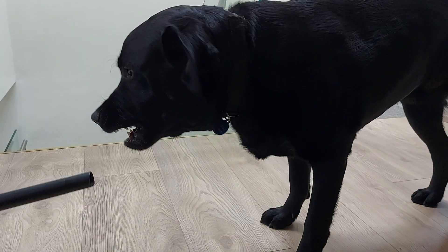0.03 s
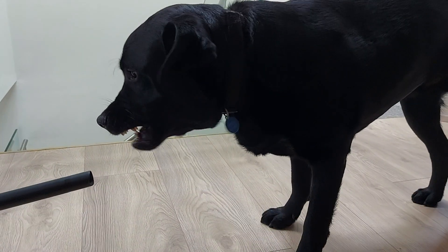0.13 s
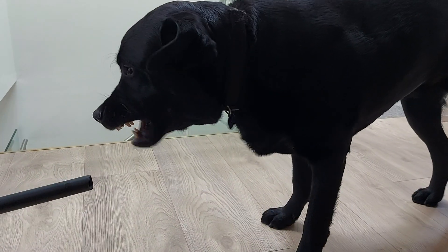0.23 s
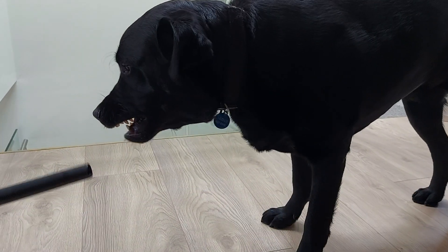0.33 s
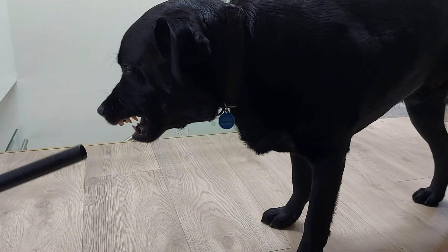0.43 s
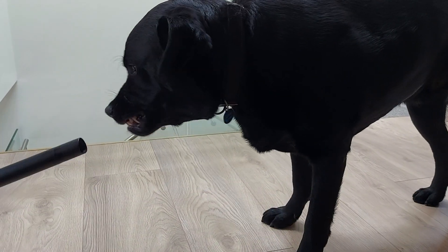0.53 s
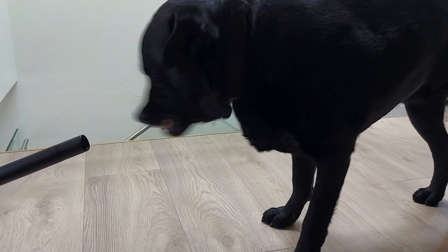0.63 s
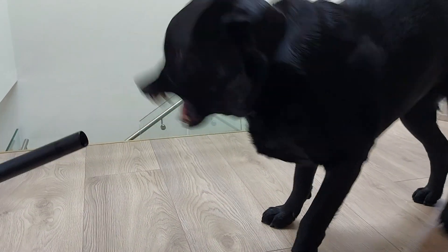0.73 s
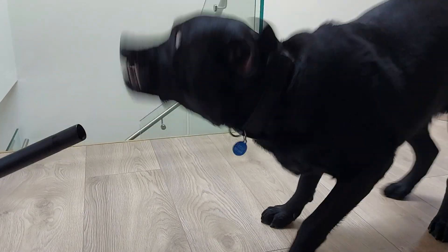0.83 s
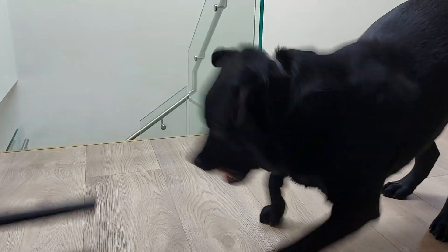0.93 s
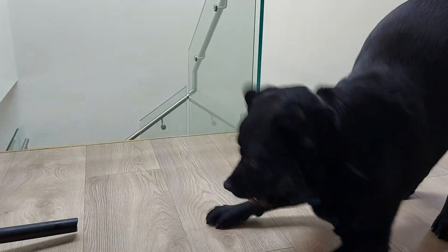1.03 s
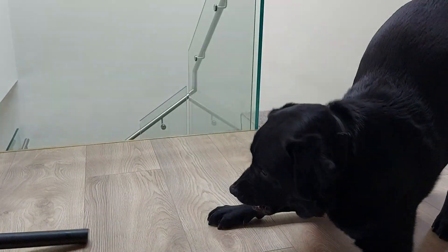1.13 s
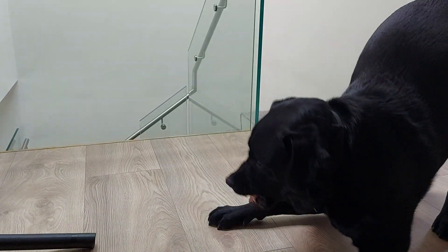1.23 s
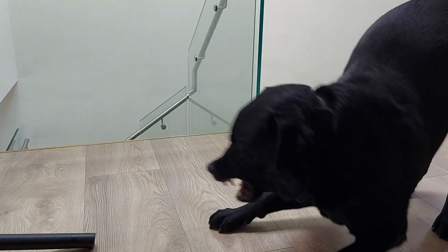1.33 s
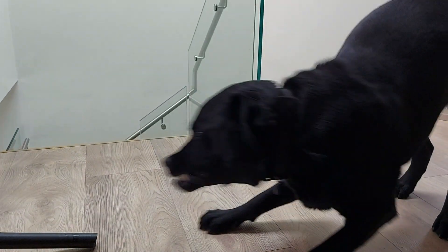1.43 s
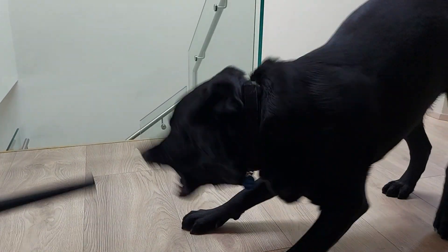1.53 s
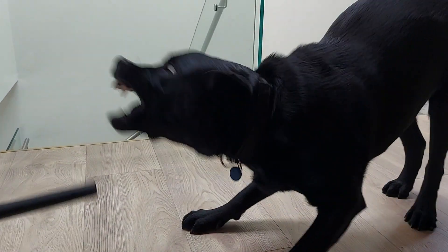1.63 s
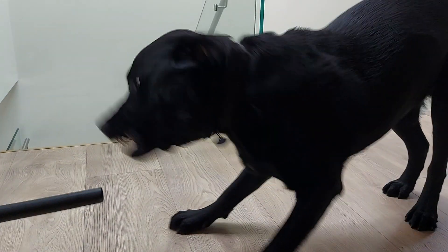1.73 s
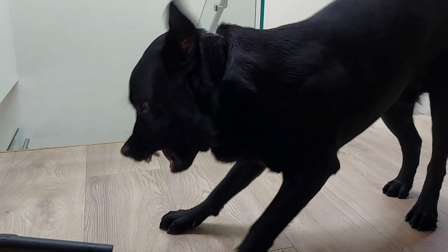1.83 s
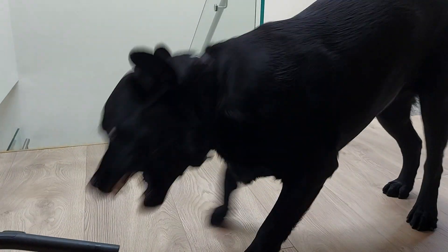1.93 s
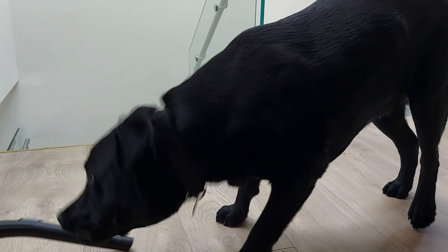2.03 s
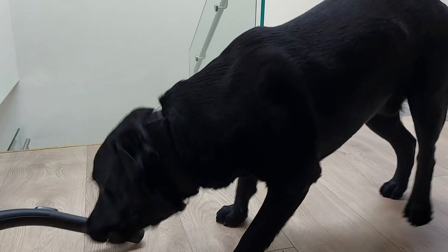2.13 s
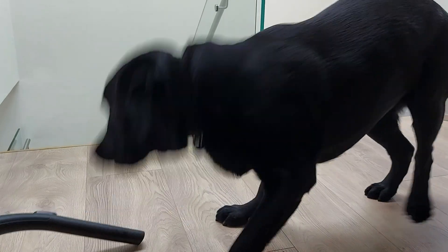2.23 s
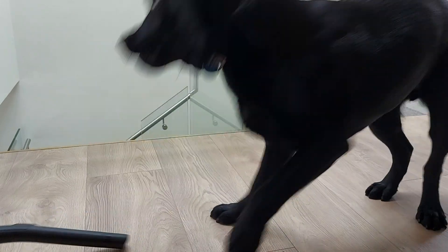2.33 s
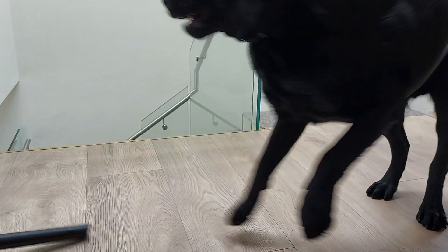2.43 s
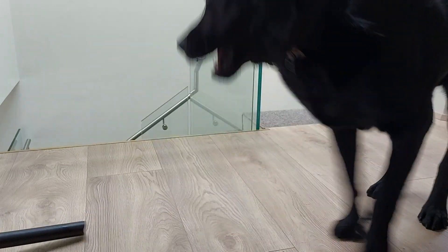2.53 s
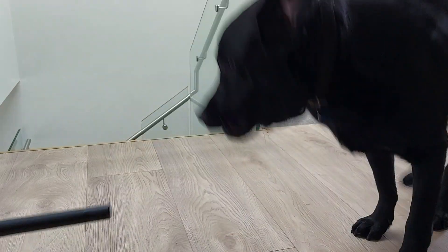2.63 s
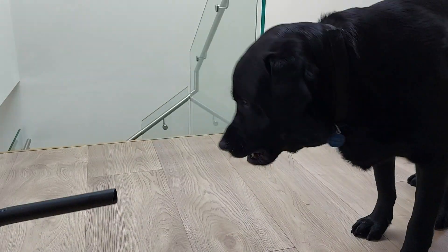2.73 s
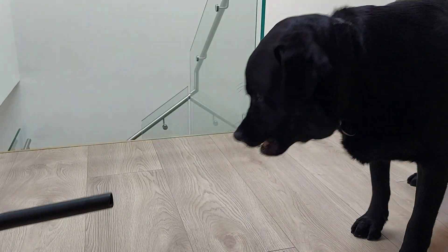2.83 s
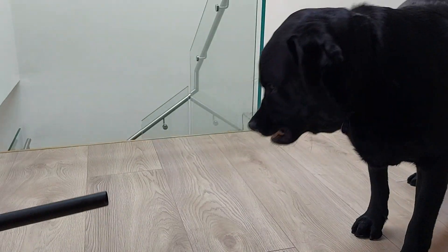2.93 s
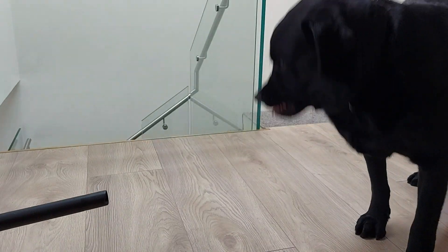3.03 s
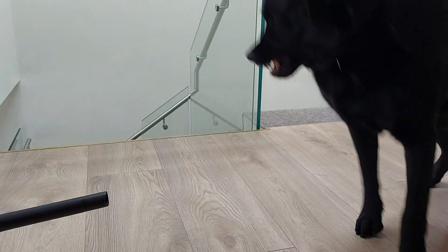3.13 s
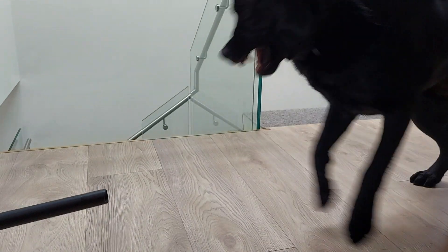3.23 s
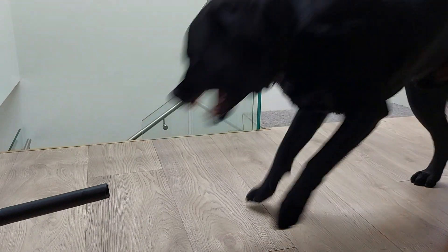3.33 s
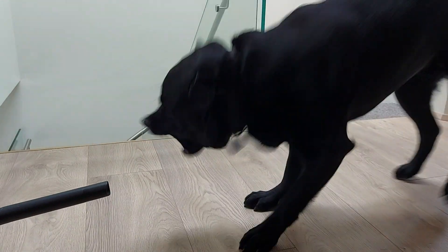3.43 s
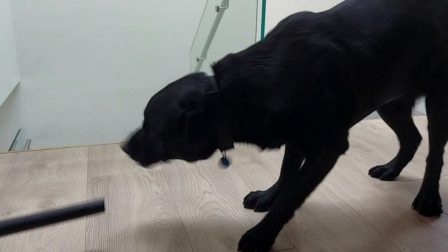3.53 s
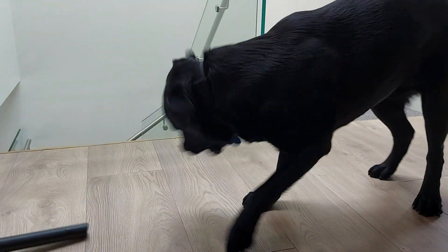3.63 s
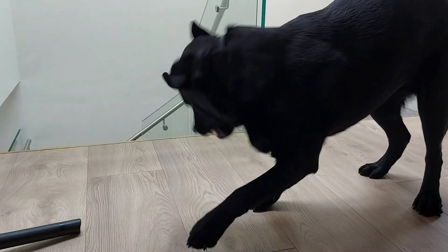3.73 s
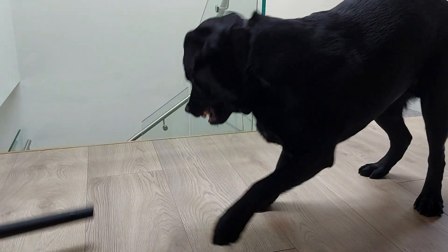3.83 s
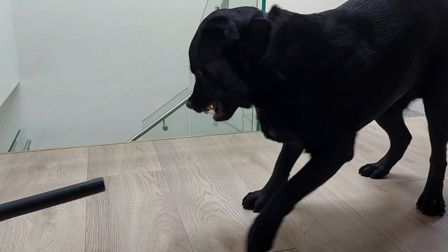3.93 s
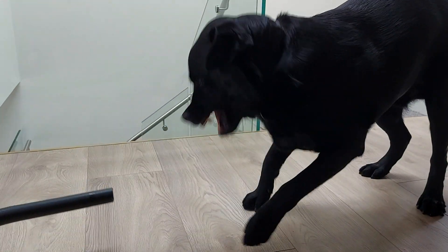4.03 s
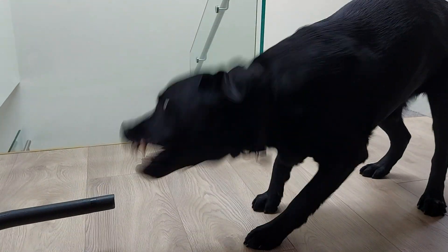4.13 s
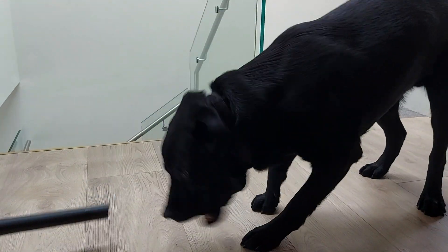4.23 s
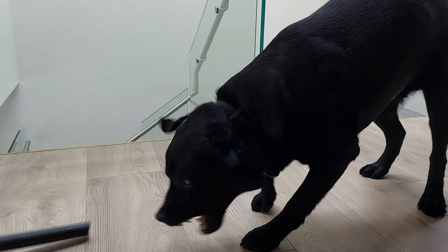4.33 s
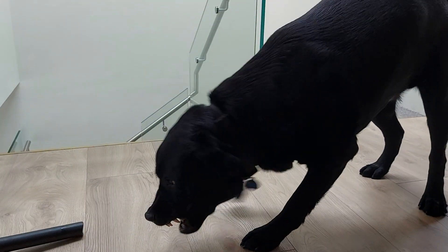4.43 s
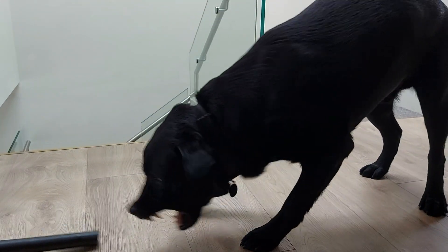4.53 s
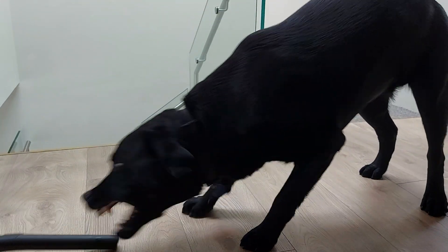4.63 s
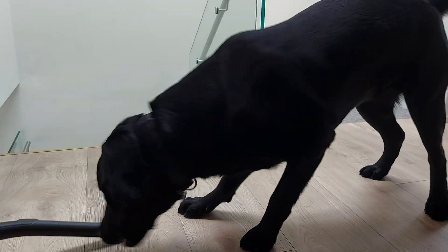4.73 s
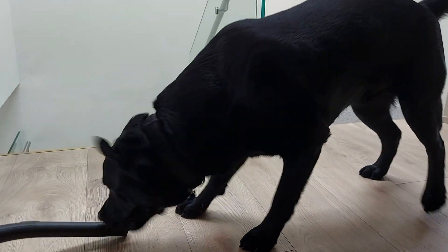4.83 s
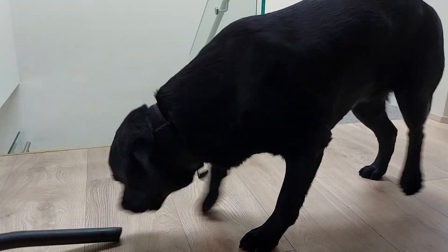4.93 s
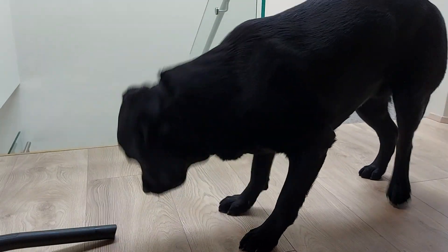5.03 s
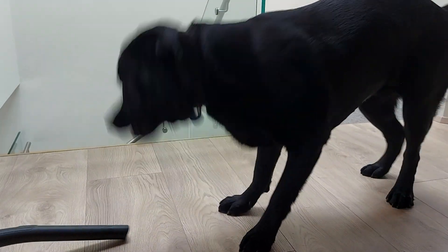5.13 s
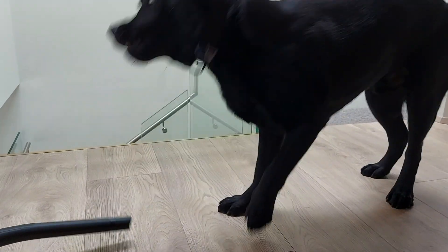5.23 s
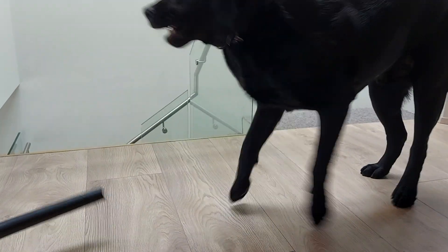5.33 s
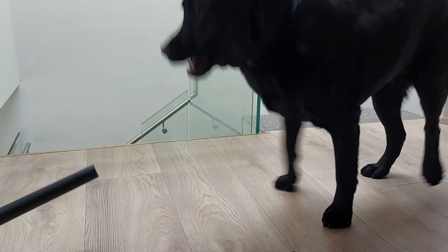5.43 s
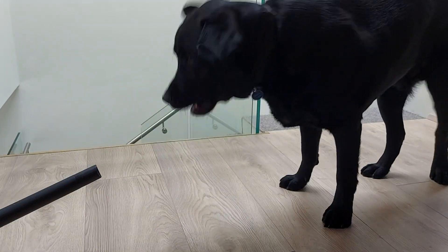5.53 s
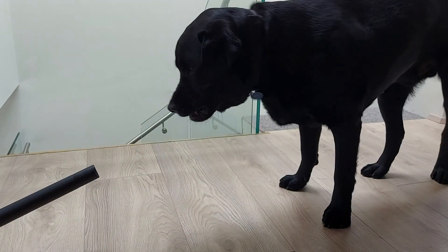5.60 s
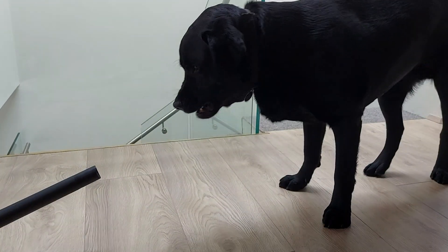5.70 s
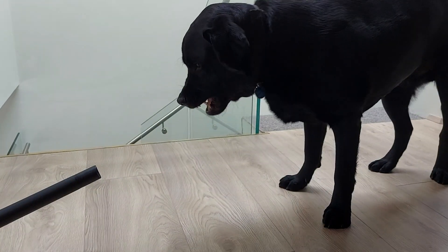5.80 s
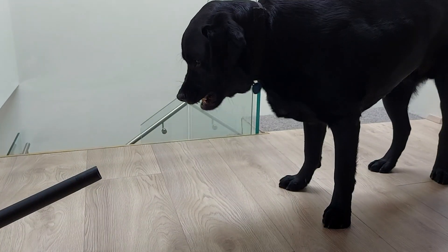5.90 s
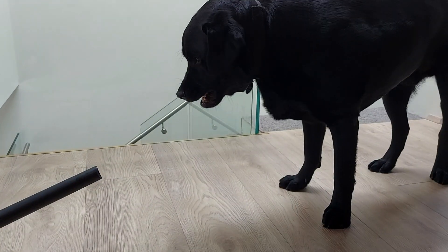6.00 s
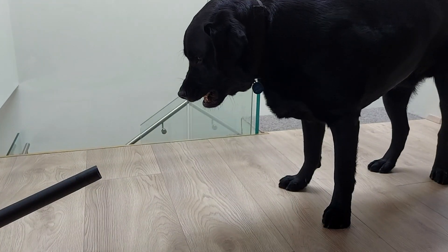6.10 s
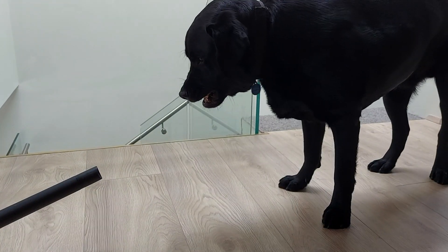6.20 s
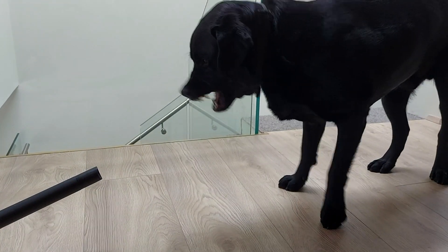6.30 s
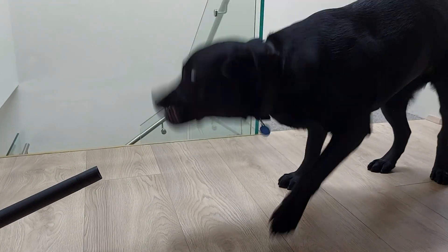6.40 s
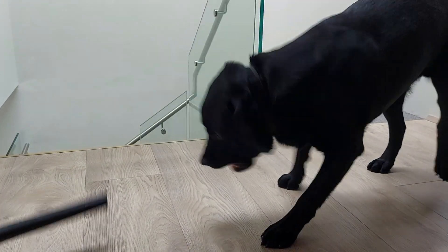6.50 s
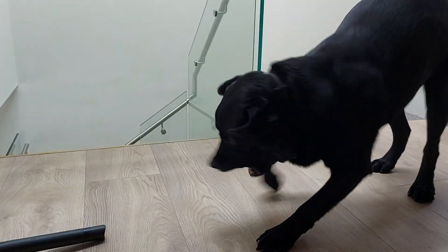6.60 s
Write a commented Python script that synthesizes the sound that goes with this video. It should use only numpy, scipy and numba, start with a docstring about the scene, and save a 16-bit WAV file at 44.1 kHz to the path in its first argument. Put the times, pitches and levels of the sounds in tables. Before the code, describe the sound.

A vacuum cleaner runs from start to finish on a hard-floored landing, humming one steady mid-pitched note over rushing air. Close to the microphone and much louder, a large dog barks at about 0.8 and 1.6 seconds, again at 3.5, 4.1 and 4.6, and once more at 6.4. Each bark is short, leaps in pitch and turns hoarse, ringing in the stairwell for just under a second. Claws tick on the floor around 1 second, between 1.9 and 2.7, and near 3.4, 5.5 and 6.6. Paws land with soft, low thuds here and there. A collar tag clinks faintly a few times between 3.4 and 4.9 seconds. A thin, faint hiss of air comes and goes around 2.2 seconds. The vacuum swells ahead of some barks and then drops back, most clearly at 3.4 and 6.4 seconds.

```python
"""Dog barking at a vacuum cleaner

On a hard-floored landing, close to the microphone, a large dog barks six times into a ringing stairwell.
Each bark starts voiced, leaps in pitch and turns hoarse; claws tick, paws thud, a collar tag clinks.
Behind, the vacuum's motor hums one strong note over rushing air. The recorder's gain lifts that steady
sound ahead of some barks, then drops back, and a limiter holds the barks down."""
import sys
import numpy as np
from scipy import signal
from scipy.fft import rfft, irfft, next_fast_len
from scipy.io import wavfile
from scipy.ndimage import uniform_filter1d, minimum_filter1d
from numba import njit

SR = 44100
rng = np.random.default_rng(int(sys.argv[2]) if len(sys.argv) > 2 else 0)


def pcm_store(signal):
    """Save signal as 16-bit PCM."""
    levels = np.round(np.clip(np.atleast_2d(signal), -1, 1) * 32767)
    wavfile.write(sys.argv[1], SR, levels.astype(np.int16).T)


N = 293706
TIME = np.arange(N) / SR

# Table levels are relative; balance is left minus right at the microphone.
# The barks, each a dict of five gestures, timed from the start of its call:
#   call: start/s, length/s, balance/dB, lead-in growl/dB
#   arch (pitch): first/Hz, top/Hz, last/Hz, crest/s, rise/s, fall/s
#   hoot (chest): peak/s, level/dB, attack/(dB/s), release/(dB/s)
#   jaw (open mouth): open/s, level/dB, attack/(dB/s), release/(dB/s), hold/s
#   crack (into hoarseness): t/s, roughness 0-1 before, after, mouth resonance/Hz before, after
BARKS = [ dict(call=(0.773, .225, -1, -48), arch=(540, 660, 450, .049, .036, .058),
         hoot=(.052, -10.5, 420, 78), jaw=(.048, -15.5, 2400, 290, .112), crack=(.1, .85, .68, 770, 1180)),
         dict(call=(1.567, .27, -.7, -30), arch=(290, 545, 515, .1, .056, .07), hoot=(.096, -10.5, 200, 20),
         jaw=(.085, -11, 185, 175, .028), crack=(.053, .2, .42, 1280, 1300)), dict(call=(3.455, .2, 2, -42),
         arch=(390, 645, 390, .088, .055, .075), hoot=(.033, -3, 900, 210), jaw=(.09, -7.5, 95, 190, .012),
         crack=(.083, .1, .72, 1200, 1330)), dict(call=(4.148, .14, 1, -35),
         arch=(295, 555, 430, .065, .045, .036), hoot=(.087, -6.5, 320, 400),
         jaw=(.015, -10, 1000, 480, .044), crack=(.054, .25, .58, 930, 1100)),
         dict(call=(4.55, .3, .8, -26.5), arch=(285, 526, 430, .207, .046, .04), hoot=(.21, -6, 330, 230),
         jaw=(.17, -15, 290, 650, .035), crack=(.167, .1, .6, 950, 1150)), dict(call=(6.381, .2, .8, -35),
         arch=(340, 595, 325, .054, .031, .066), hoot=(.1, -16.5, 150, 110),
         jaw=(.014, -6, 1000, 175, .026), crack=(.046, .15, .76, 750, 1130))]
# The mouth in each bark: rasp f/Hz, its level/dB, level a fifth above/dB, tongue resonance/dB
MOUTHS = [(3300, -44, -29, -32), (3910, -25, -22.5, -22), (3600, -22, -26, -26), (3740, -23, -27.5, -4),
          (3500, -30, -25, -6), (3650, -26.5, -41, -4.5)]
# The throat's colour: f/Hz, level/dB
THROAT_COLOUR = [(150, -28), (280, -8), (500, -8), (800, 1), (1200, -1), (1600, -1), (2250, -2),
                 (2500, -13), (2900, -31), (3900, -22.5), (7000, -23.5), (9500, -35), (12500, -32),
                 (16000, -41)]
# Claws striking the floor: t/s, level/dB, balance/dB, top-octave lift/dB
CLAW_STRIKES = [(0.98, -32, -1.5, 24), (1.0417, -16.5, -5.5, 24), (1.1187, -26, -4.5, 19),
                (1.9007, -31.5, -4, 19), (2.0072, -31, -8.5, 15), (2.362, -27, 2, 13), (2.597, -25, -1, 16),
                (2.6602, -22.5, -1, 18), (2.7285, -28.5, -1, 9), (3.4414, -24, 1, 22),
                (5.4321, -24.5, -4, 8), (5.4911, -27, -1.5, 3), (6.648, -30, 1, 18)]
# The colour of a claw's crack: f/Hz, level/dB
CLAW_COLOUR = [(400, -3.5), (1200, 4.5), (2500, 9.5), (3800, 12.5), (5500, 5), (8000, 9), (10000, -15),
               (13000, -9.5), (16000, -34)]
# Paws landing: t/s, level/dB
PAW_FALLS = [(0.066, -34), (0.789, -28), (1.442, -44), (2.197, -42), (3.269, -48), (3.426, -42),
             (5.049, -35)]
# The floor's modes: f/Hz, level/dB, t60/s
FLOOR_MODES = [(61.6, -4, .35), (80.6, -4, 0.45), (105, 3, 0.16), (140, -3, 0.2), (206, 1.5, 0.16)]
# Knocks on the collar tag: t/s, level/dB
TAG_KNOCKS = [(3.4244, -40), (3.6676, -46), (3.6894, -53), (4.2887, -58), (4.8898, -53)]
# The motor's orders: multiples of its main note
MOTOR_ORDERS = [1, 2, 3, 3.5, 4, 4.8, 8, 16, 20, 24]
# The tone at each order: level/dB, phase lead of the left channel/rad
MOTOR_TONES = [(-35, -0.135), (-66, 0.4), (-55, -1.05), (-73, 1.4), (-67, 0.79), (-66.5, 1.1), (-69, -0.92),
               (-59.5, -2.6), (-75, 1), (-84, -1)]
# The vacuum's rushing air: f/Hz, spectral density/dB
AIR_COLOUR = [(30, -31), (65, -4), (102, 5.5), (160, -6.5), (230, 2.5), (300, 9), (420, 3.5), (560, 9.5),
              (1000, -1), (2000, 1), (4200, -2), (7800, -7.5), (9600, -13.5), (12000, -6), (16000, -20.5)]
# Where that air sits in the stereo image: f/Hz, balance/dB
AIR_BALANCE = [(100, -.5), (1300, -.5), (2400, -3.5), (4400, -0.5), (8100, -12), (15000, 2.5)]
# The recorder's automatic gain, as timed lifts of the steady vacuum: peak t/s, lift/dB, rise/s, fall/s
GAIN_RISES = [(.78, 4.5, .24, .25), (1.35, 2.8, .25, .8), (3.45, 10, .43, .34), (6.38, 8, .36, .15)]
# The stairwell's decay: f/Hz, t60/s
STAIRWELL_T60 = [(100, 0.97), (300, 0.97), (500, 0.7), (1000, 0.89), (2000, 0.86), (4000, 0.4), (8000, 0.8),
                 (15000, 0.083)]
# The stairwell's colour: f/Hz, level/dB
STAIRWELL_COLOUR = [(100, 0.5), (250, -1), (350, 4), (500, -0.5), (750, 4), (1200, 1.5), (2200, -0.5),
                    (5000, 2.5), (15000, -1)]
# Diffuse sound at the microphone: f/Hz, left-right correlation
STEREO_LIKENESS = [(60, 0.94), (300, 0.91), (640, 0.52), (1000, 0.39), (1400, -0.24), (3000, -0.19),
                   (15000, 0.13)]


def dog(level_db=-3, low_cut_hz=310):
    """All the barks, from one throat that moves from side to side; the mouth radiates little bass."""
    out = np.zeros((2, N))
    for row, mouth in zip(BARKS, MOUTHS):
        start_s, length_s, balance_db, _ = row["call"]
        t = np.arange(0, length_s, 1 / SR)
        add(out, start_s, from_db(level_db) * bark(t, row, *mouth) * pan(balance_db))
    return butterworth(out, 4, low_cut_hz, "high")


def bark(t, row, rasp_hz, rasp_db, fifth_db, tongue_db, wander=.018, rush_db=4, fade_db_per_s=110):
    """The vocal folds and the breath sound a low hoot and a bright, rasping open-mouth voice."""
    pitch_hz, hoot_db, open_db, rough, mouth_hz = gesture(t, **row)
    pitch_hz = pitch_hz * (1 + wander * np.sqrt(rough) * drift(30.4, len(t)))
    folds, breath = vocal_folds(pitch_hz, rough)
    voice = open_mouth(folds, breath, rough, mouth_hz, tongue_db)
    hoot = chest_hoot(folds, breath, rough, pitch_hz)
    # the rasp is strongest in the first rush of air once the mouth is open, then fades
    open_s = np.cumsum(open_db > open_db.max() - 8) / SR
    rasp = teeth_rasp(breath, rasp_hz, rasp_db, fifth_db) * from_db(rush_db - fade_db_per_s * open_s)
    sound = hoot * from_db(hoot_db) + (voice + rasp) * from_db(open_db)
    return sound * signal.windows.tukey(len(t), .03)


def gesture(t, call, arch, hoot, jaw, crack, break_width_s=.016, onset_db=-18, onset_s=.005):
    """Pitch, hoot level, open-mouth level, roughness and mouth resonance through one bark."""
    growl_db, hoot_s = call[3], hoot[0]
    break_s, rough_before, rough_after, mouth_before_hz, mouth_after_hz = crack
    broken = .5 + .5 * np.tanh((t - break_s) / break_width_s)
    rough = rough_before + (rough_after - rough_before) * broken
    rough *= 1 - .5 * bell(t - hoot_s, width_s=.015)  # the folds steady around the hoot's peak
    mouth_hz = mouth_before_hz + (mouth_after_hz - mouth_before_hz) * broken
    taking_hold_db = onset_db * np.exp(-t / onset_s)
    hoot_db = taking_hold_db + envelope_db(t, growl_db - 5, *hoot)  # the hoot is weak in the growl
    open_db = taking_hold_db + envelope_db(t, growl_db, *jaw)
    return pitch_arch(t, *arch), hoot_db, open_db, np.clip(rough, 0, 1), mouth_hz


def pitch_arch(t, first_hz, top_hz, last_hz, crest_s, rise_s, fall_s, sag_hz_per_s=110):
    """Pitch slides down, leaps with the push of air and sinks as it runs out."""
    base_hz = np.where(t < crest_s, first_hz - sag_hz_per_s * t, last_hz)
    return base_hz + (top_hz - base_hz) * bell(t - crest_s, np.where(t < crest_s, rise_s, fall_s))


def envelope_db(t, growl_db, full_s, db, attack_db_per_s, release_db_per_s, hold_s=0):
    """Attack out of the lead-in growl, hold, release."""
    attack = np.maximum(db - attack_db_per_s * (full_s - t), growl_db)
    release = db - release_db_per_s * np.maximum(t - full_s - hold_s, 0)
    return np.where(t < full_s, attack, release)


def vocal_folds(pitch_hz, rough, jitter=.0497, flutter=.85, halves_db=-5):
    """Clean pulses turn uneven and doubled with roughness; breath noise puffs in step with them."""
    n = len(pitch_hz)
    phase = 2 * np.pi * np.cumsum(pitch_hz * (1 + jitter * rough * drift(110, n))) / SR
    harmonics = np.arange(1, 10)[:, None]
    height = np.sqrt(4 * pitch_hz / SR)  # same power per Hz at any pitch
    pulses = height * np.cos(harmonics * phase).sum(axis=0)
    # strong and weak pulses alternate, giving lines half-way between the harmonics
    halves = height * np.cos((harmonics - .5) * phase).sum(axis=0) * drift(57, n)
    strength = np.sqrt(1 - rough ** 2) * (1 + flutter * rough * drift(74, n))
    folds = strength * (pulses + from_db(halves_db) * rough * halves)
    breath = rng.standard_normal(n) * (1 + 1.63 * np.cos(phase))
    return folds, breath


def open_mouth(folds, breath, rough, mouth_hz, tongue_db, breath_db=1, hiss_db=-10.5, mouth_db=7):
    """Pulses and breath pass through the throat and ring the mouth and tongue resonances."""
    hiss = from_db(hiss_db) * butterworth(breath, 2, 3500, "high")
    throat = colour(folds + from_db(breath_db) * rough * breath + hiss, THROAT_COLOUR)
    mouth = from_db(mouth_db) * resonance(throat, mouth_hz, width_hz=260)
    tongue = from_db(tongue_db) * resonance(throat, hz=np.full(len(throat), 2090.), width_hz=640)
    return evened(throat + mouth + tongue)


def chest_hoot(folds, breath, rough, pitch_hz, chest_hz=479, breath_db=-1.5):
    """The lowest resonance, which rides up with the pitch as the jaw drops."""
    hoot = folds + from_db(breath_db) * rough * breath
    for _ in range(2):
        hoot = resonance(hoot, np.maximum(pitch_hz, chest_hz), width_hz=280)
    return evened(hoot)


def teeth_rasp(breath, hz, low_db, high_db, width_hz=550):
    """Air rushing past the teeth rings two high resonances a fifth apart."""
    t60 = np.log(1000) / (np.pi * width_hz)
    jet = butterworth(breath, 2, [3000, 7000], "band")
    low = from_db(low_db) * rms_one(ring(jet, hz, t60))
    high = from_db(high_db) * rms_one(ring(jet, 1.5 * hz, t60))
    return low + high


def claws(level_db=-7, t60=.013, next_claw_s=.009, next_claw_db=-12):
    """A claw cracks on the hard floor and a second follows; sharper contacts are brighter."""
    out = np.zeros((2, N))
    t = np.arange(int(.06 * SR)) / SR
    decay = from_db(-60 * t / t60)
    for s, db, balance_db, lift_db in CLAW_STRIKES:
        tint = [(hz, band_db + lift_db * (hz > 9000)) for hz, band_db in CLAW_COLOUR]
        crack = np.array([colour(rng.standard_normal(len(t)) * decay, tint) for channel in range(2)])
        attack_rms = np.sqrt(np.mean(crack[:, :int(.003 * SR)] ** 2))
        crack *= from_db(db + level_db) * pan(balance_db) / attack_rms
        add(out, s, crack)
        add(out, s + next_claw_s, from_db(next_claw_db) * crack)
    return out


def paws(level_db=-7, scuff_s=.044, stamp_db=-35.5):
    """Soft pads push and scuff the floor, which booms; a forepaw also stamps with each bark."""
    force = np.zeros(N)
    t = np.arange(int(.15 * SR)) / SR
    stamps = [(row["call"][0] + row["jaw"][0], stamp_db) for row in BARKS]
    for s, db in PAW_FALLS + stamps:
        push = rng.standard_normal(len(t)) * np.exp(-t / scuff_s)
        add(force, s, from_db(db + level_db) * push / np.linalg.norm(push))
    force = butterworth(force, 2, 50, "high")
    return sum((-1) ** k * from_db(db) * ring(force, hz, t60)
               for k, (hz, db, t60) in enumerate(FLOOR_MODES))


def collar_tag(level_db=2, hz=10730, t60=.074):
    """Each knock sets the tag ringing on one high note."""
    knocks = np.zeros(N)
    for s, db in TAG_KNOCKS:
        add(knocks, s, from_db([db]))
    return from_db(level_db) * ring(knocks, hz, t60)


def vacuum(level_db=.6):
    """Steady rushing air and motor hum."""
    return from_db(level_db) * (rushing_air() + motor())


def rushing_air(relative_db=-44):
    """The vacuum's airflow reaches the microphone as broad, diffuse noise."""
    size = next_fast_len(N)
    hz, noise = diffuse(size)
    spectrum = noise * from_db(at_hz(AIR_COLOUR, hz)) * (hz > 20) * pan(at_hz(AIR_BALANCE, hz))
    return from_db(relative_db) * rms_one(irfft(spectrum, size)[:, :N])


def motor(hz=582.8, wobble=.00038, hum_waver_db=.7, upper_waver_db=.75):
    """The spinning motor sounds one strong note and faint upper orders, each wavering in level."""
    size = next_fast_len(N)
    turn = 2 * np.pi * hz * np.cumsum(1 + wobble * drift(2.8, size)[:N]) / SR
    out = np.zeros((2, N))
    for order, (db, lead) in zip(MOTOR_ORDERS, MOTOR_TONES):
        waver_db = (hum_waver_db if order < 2 else upper_waver_db) * drift(4, size)[:N]
        out += np.sqrt(2) * from_db(db + waver_db) * np.sin(order * turn + left_right(lead))
    return out


def nozzle(peak_s=2.2, level_db=-60, width_s=.33, band_hz=(11500, 14300)):
    """A thin, high hiss of air comes and goes at the mouth of the tube."""
    hiss = butterworth(rng.standard_normal((2, N)), 2, band_hz, "band")
    return from_db(level_db) * rms_one(hiss) * bell(TIME - peak_s, width_s)


def stairwell(x, early_db=4, early_s=.015, gap_s=.0022):
    """Dense early reflections off floor and glass, then a tail that dies band by band."""
    size = 65536
    t = np.arange(size) / SR
    hz, noise = diffuse(size)
    noise = noise * from_db(at_hz(STAIRWELL_COLOUR, hz))
    edges_hz = np.r_[0, np.geomspace(150, 12000, 12), SR]
    tail = 0
    for low, high in zip(edges_hz, edges_hz[1:]):
        t60 = at_hz(STAIRWELL_T60, (low + high) / 2)
        tail = tail + irfft(noise * ((hz >= low) & (hz < high))) * from_db(-60 * t / t60)
    shape = (t > gap_s) * (1 + from_db(early_db) * np.exp(-t / early_s))
    mid_decay = from_db(-60 * t / at_hz(STAIRWELL_T60, 1500))
    tail *= shape / np.linalg.norm(shape * mid_decay)
    return signal.fftconvolve(x, tail, axes=1)[:, :N]


def recorder_gain():
    """The gain on the vacuum's sound rises at set times ahead of barks, then drops back."""
    return from_db(sum(np.interp(TIME, [s - rise_s, s, s + fall_s], [0, db, 0])
                       for s, db, rise_s, fall_s in GAIN_RISES))


def limiter(x, release_db_per_s=200, ahead_s=.002):
    """The gain drops just ahead of each peak over full scale and recovers."""
    over_db = np.maximum(20 * np.log10(np.abs(x).max(axis=0) + 1e-9), 0)
    held_db = np.maximum.accumulate(over_db + release_db_per_s * TIME) - release_db_per_s * TIME
    ahead = int(ahead_s * SR)
    return x * from_db(uniform_filter1d(minimum_filter1d(-held_db, 2 * ahead), ahead))


def from_db(db):
    """Decibels to gain."""
    return 10 ** (np.asarray(db) / 20)


def rms_one(x):
    """Scale to unit power."""
    return x / np.sqrt(np.mean(x ** 2) + 1e-20)


def evened(x, window_s=.014):
    """Hold the running power at 1."""
    return x / np.sqrt(np.abs(uniform_filter1d(x ** 2, int(window_s * SR))) + 1e-12)


def bell(t, width_s):
    """A smooth hump of height 1 around t = 0."""
    return np.exp(-(t / width_s) ** 2)


def drift(rate_hz, n):
    """Smooth random wander of spread 1."""
    hz = np.fft.rfftfreq(2 * n, 1 / SR)
    return rms_one(irfft(rfft(rng.standard_normal(2 * n)) / (1 + (hz / rate_hz) ** 2)))[:n]


def diffuse(n):
    """Frequencies and stereo noise spectra, alike in the bass and nearly unrelated in the treble."""
    hz = np.fft.rfftfreq(n, 1 / SR)
    mid, side = rfft(rng.standard_normal((2, n)))
    alike = np.clip(at_hz(STEREO_LIKENESS, hz), -1, 1)
    return hz, (np.sqrt(1 + alike) * mid + np.sqrt(1 - alike) * side * [[1], [-1]]) / np.sqrt(2)


def left_right(difference):
    """Split a difference evenly between the channels."""
    return np.array([[.5], [-.5]]) * difference


def pan(balance_db):
    """Left and right gains for a level difference."""
    return from_db(left_right(balance_db))


def add(out, s, sound):
    """Mix a sound in at time s."""
    i = max(int(s * SR), 0)
    out[..., i:i + sound.shape[-1]] += sound[..., :N - i]


def at_hz(points, hz):
    """Read a spectrum on a log-frequency axis."""
    f, value = np.transpose(points)
    return np.interp(np.log(np.maximum(hz, 1)), np.log(f), value)


def colour(x, points, size=4096):
    """Causal (minimum-phase) filter with the given spectrum."""
    gain = from_db(at_hz(points, np.fft.rfftfreq(size, 1 / SR)))
    cepstrum = irfft(np.log(gain))
    cepstrum[1:size // 2] *= 2
    cepstrum[size // 2 + 1:] = 0
    return signal.fftconvolve(x, irfft(np.exp(rfft(cepstrum))))[:len(x)]


def butterworth(x, order, hz, kind):
    """A filter with a flat passband."""
    return signal.sosfilt(signal.butter(order, hz, kind, fs=SR, output="sos"), x)


def ring(x, hz, t60):
    """A unit click sets a sine of height 1 ringing."""
    r, w = from_db(-60 / (t60 * SR)), 2 * np.pi * hz / SR
    return signal.lfilter([0, np.sin(w)], [1, -2 * r * np.cos(w), r * r], x + 1e-18)


def resonance(x, hz, width_hz):
    """A band-pass whose centre follows the curve hz."""
    return moving_resonance(x, 2 * np.pi * hz / SR, width_hz / hz)


@njit
def moving_resonance(x, w, damping):
    """State-variable band-pass with a moving centre, gain 1 on top."""
    y, low, band = np.zeros(len(x)), 0., 0.
    for i in range(len(x)):
        low += w[i] * band
        band += w[i] * (x[i] - low - damping[i] * band)
        y[i] = band * damping[i]
    return y


def scene(bark_room_db=1, tick_room_db=3.5, thud_room_db=-6):
    """The dog is close and a little to the left, the stairwell answers, the vacuum fills the landing."""
    barks, thuds = dog(), paws()
    direct = np.array([barks[0], np.roll(barks[1], 4)])  # reaches the right channel 4 samples later
    ticks = claws() + collar_tag()
    into_room = (from_db(bark_room_db) * barks + from_db(tick_room_db) * ticks
                 + from_db(thud_room_db) * thuds)
    return direct + ticks + thuds + stairwell(into_room) + vacuum() * recorder_gain() + nozzle()


def record(dry, cutoff_hz=16200):
    """After the microphone, peaks are limited and the top is cut steeply."""
    top_cut = signal.ellip(10, .1, 80, cutoff_hz, fs=SR, output="sos")
    return signal.sosfilt(top_cut, limiter(dry))


dry = scene()
out = record(dry)
pcm_store(out)
```